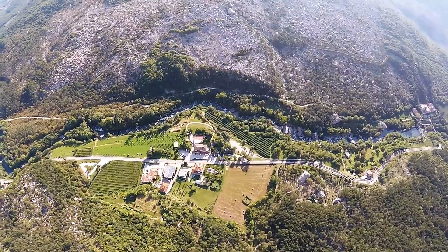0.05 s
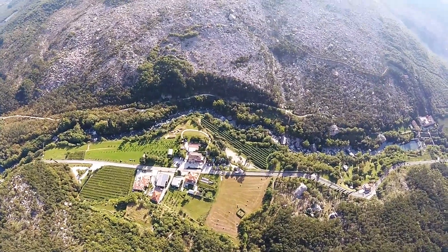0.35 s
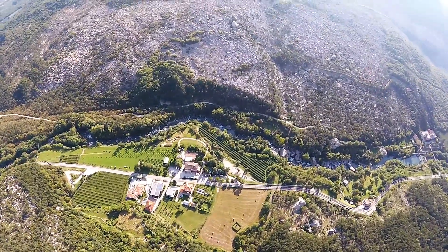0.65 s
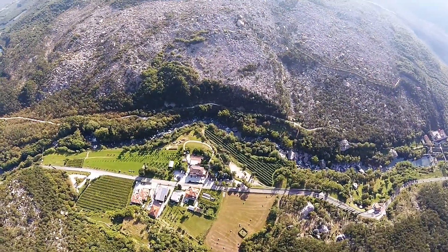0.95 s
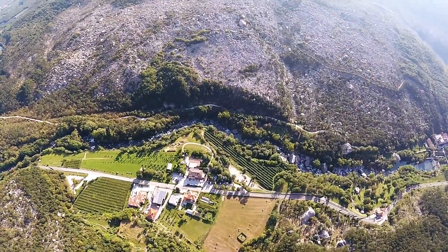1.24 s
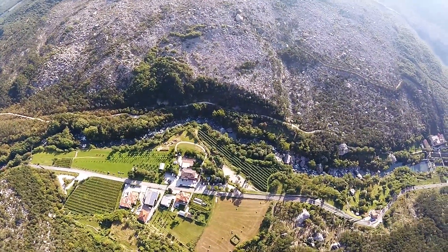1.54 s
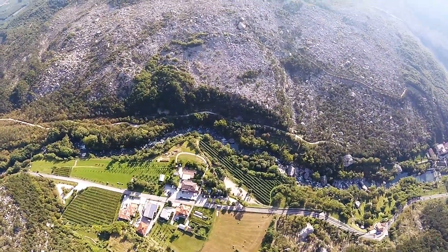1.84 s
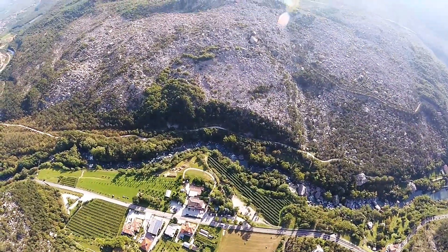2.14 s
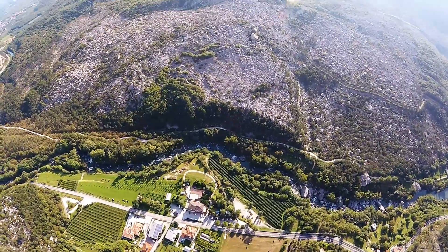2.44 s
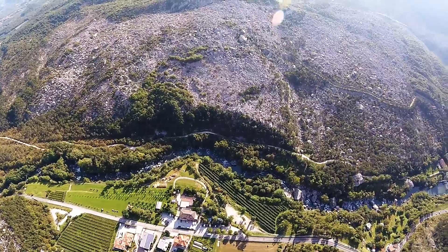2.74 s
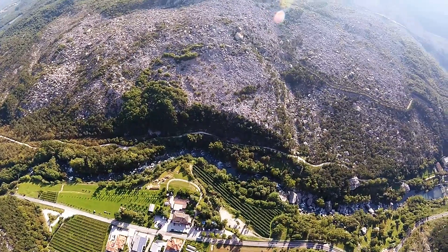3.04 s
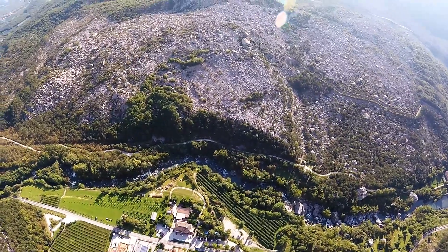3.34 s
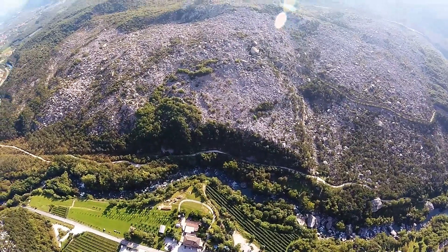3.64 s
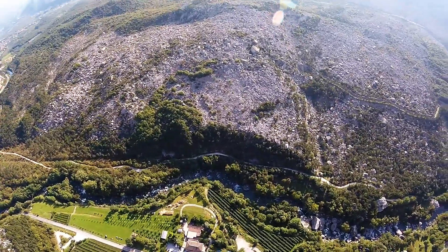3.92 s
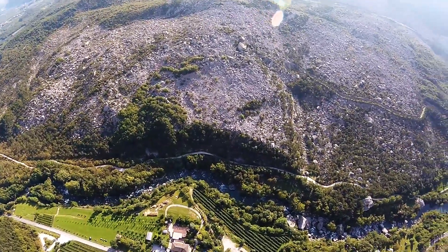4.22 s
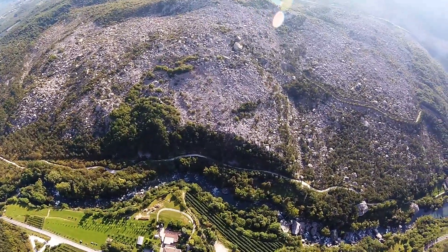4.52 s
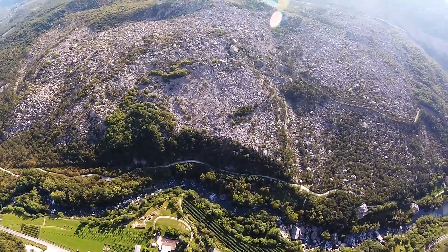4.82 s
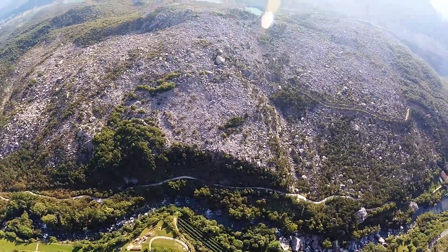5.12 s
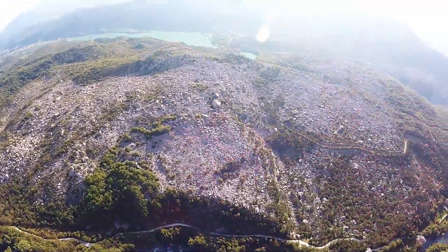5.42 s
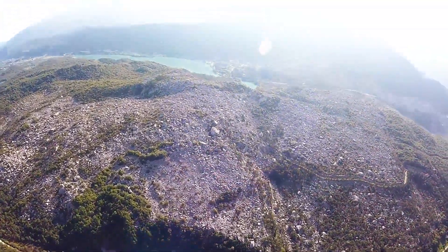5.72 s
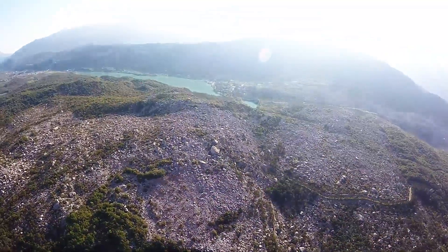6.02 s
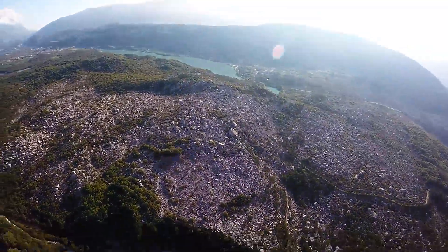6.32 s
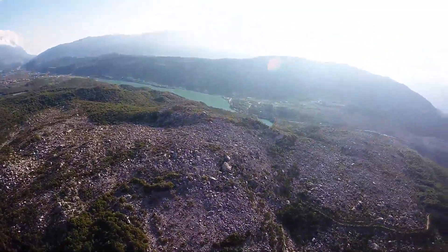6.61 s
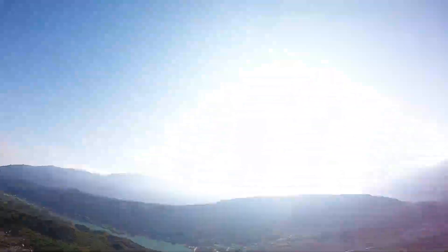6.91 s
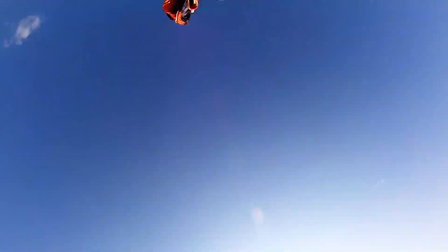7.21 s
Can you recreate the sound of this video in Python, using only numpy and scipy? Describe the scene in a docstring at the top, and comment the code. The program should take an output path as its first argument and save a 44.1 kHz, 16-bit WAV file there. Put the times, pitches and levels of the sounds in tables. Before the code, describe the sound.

Strong wind buffets a microphone in fast flight with a loud, deep rumble, turning rougher and louder near the end.

```python
"""Air above a valley: a camera on a flyer's body races along, then tips up towards the sky.
Eddies pound the microphone port in a deep rumble that a fast bass limiter holds level.
Air roars, rushes and hisses past the housing, spits in short bursts and hums faintly on edges.
As the camera turns, the flow swishes and grows louder, darker and ragged."""
import sys
import numpy as np
from scipy import signal
from scipy.fft import rfft, irfft, next_fast_len
from scipy.io import wavfile
from scipy.ndimage import uniform_filter1d, minimum_filter1d, map_coordinates

SR = 44100
rng = np.random.default_rng(int(sys.argv[2]) if len(sys.argv) > 2 else 0)


def inscribe(sig):
    """Save sig as 16-bit PCM at rate SR to the path in sys.argv[1].

    A 1-D sig is mono; a 2-D sig holds one channel per row.
    Samples are clipped to [-1, 1] before scaling.
    """
    pcm = np.round(np.clip(np.atleast_2d(sig).T, -1, 1) * 32767)
    wavfile.write(sys.argv[1], SR, pcm.astype(np.int16))


N = 328986
TIME_S = np.arange(N) / SR
TOP_HZ = 14500


def amp(db):
    """dB to gain."""
    return 10 ** (np.asarray(db) / 20)


def unit(x):
    """Scale to rms 1."""
    return x / np.sqrt(np.mean(x ** 2) + 1e-20)


def along(points, hz):
    """Interpolate (f/Hz, value) points on log frequency."""
    f, values = np.transpose(points)
    return np.interp(np.log(hz + 1), np.log(f + 1), values)


def bell(hz, centre_hz, octaves):
    """Gaussian on log frequency, peak 1."""
    return np.exp(-.5 * (np.log2(hz / centre_hz) / octaves) ** 2)


def curves(rows):
    """One per-sample curve for each column after t/s."""
    times_s, *columns = np.transpose(rows)
    return [np.interp(TIME_S, times_s, column) for column in columns]


def wobble(knots_per_s):
    """Smooth random curve, rms about 1."""
    knots = rng.standard_normal(int(N * knots_per_s / SR) + 4)
    return map_coordinates(knots, [TIME_S * knots_per_s])


def filtered(x, response):
    """FFT filter with gain response(hz)."""
    size = next_fast_len(N + SR // 2)
    return irfft(rfft(x, size) * response(np.fft.rfftfreq(size, 1 / SR)), size)[:N]


def noise(spectrum):
    """Coloured noise, rms 1, cut off at the spectrum's last point."""
    colour = lambda hz: amp(along(spectrum, hz)) * (hz < spectrum[-1][0])
    return unit(filtered(rng.standard_normal(N), colour))


def moving_noise(spectrum, control, shade_db):
    """Noise of steady rms 1, recoloured over time by shade_db(hz, control)."""
    hz, frames_s, stft = signal.stft(noise(spectrum), SR, nperseg=1024)
    gain = amp(shade_db(np.maximum(hz, hz[1])[:, None], np.interp(frames_s, TIME_S, control)))
    gain /= np.linalg.norm(gain * amp(along(spectrum, hz))[:, None], axis=0)
    return unit(signal.istft(stft * gain, SR, nperseg=1024)[1][:N])


def sliding_band(path, octaves):
    """Noise band along a path of t/s, f/Hz, level/dB."""
    centre_hz, level_db = curves(path)
    band_db = lambda hz, centre: 20 * np.log10(bell(hz, centre, octaves) + 1e-4)
    return amp(level_db) * moving_noise([(0, 0), (TOP_HZ, 0)], centre_hz, band_db)


def limited(x, ceiling, hold_s):
    """Look-ahead limiter: turns each crest down to the ceiling."""
    size = max(int(hold_s * SR), 2)
    gain = ceiling / np.maximum(np.abs(x), ceiling)
    return x * uniform_filter1d(minimum_filter1d(gain, size), size)


def buffet():
    """Large eddies strike the port; the limiter flattens their crests to one height."""
    # eddy strength before overdrive: t/s, rumble level/dB, thud level/dB
    eddy_levels = [(0, -14.5, -18.5), (.8, -12.5, -17), (2.6, -13.5, -21.5), (3.7, -13, -22),
                   (4.7, -12.5, -19), (5.15, -21.5, -20), (5.38, -17.5, -20.5), (5.55, -17.5, -12),
                   (6.3, -16.5, -16), (7.1, -15.5, -10.5), (7.46, -9, -11)]
    # rumble and thud spectra: f/Hz, level/dB
    rumble_spectrum = [(4, -21.5), (12, -8), (22, -1), (34, 0), (55, -4), (72, -6), (95, -31), (200, -73)]
    thud_spectrum = [(42, -29), (66, -4.5), (88, 1), (122, -2), (140, -7), (165, -20.5), (255, -30),
                     (590, -76)]
    rumble_db, thud_db = curves(eddy_levels)
    rumble = noise(rumble_spectrum) * amp(rumble_db + .1)
    thuds = noise(thud_spectrum) * amp(thud_db - 2 + 2 * wobble(32))  # in lumps
    # strong eddies push further into the limiter
    force = np.clip(np.hypot(amp(rumble_db), amp(thud_db)) / .28, 0, 1)
    overdrive_db = 3.8 * force ** 2
    return limited(amp(overdrive_db) * (rumble + thuds + booms()), ceiling=.56, hold_s=.011)


def booms():
    """Eddies of one size briefly prevail and boom in a narrow band."""
    # booms: centre t/s, half-width/s, f/Hz, level/dB
    swells = [(.09, 0.12, 65.6, -11), (0.557, 0.13, 160, -24.5), (3.7, 0.11, 93.6, -17.5),
              (3.95, .4, 187, -37.5), (6.023, 0.15, 88, -16.5), (6.595, 0.078, 174, -20),
              (6.86, .07, 870, -28.5), (7.022, 0.037, 870, -29.5), (7.13, .1, 165, -16.5)]
    sound = np.zeros(N)
    for at_s, width_s, centre_hz, level_db in swells:
        band = filtered(rng.standard_normal(N), lambda hz: bell(hz + 1, centre_hz, octaves=.21))
        sound += amp(level_db) * np.exp(-((TIME_S - at_s) / width_s) ** 2) * unit(band)
    return sound


def airflow():
    """Smaller eddies roar, rush and hiss; tipping up makes the flow heavier, darker and ragged."""
    # air past the housing: t/s, flow base level/dB, hiss base level/dB
    flow_levels = [(0, -33.5, -44.5), (.38, -32.5, -48.5), (.72, -33.5, -48.5), (1.1, -40.5, -55.5),
                   (1.55, -39, -51.5), (1.72, -39, -53.5), (2.15, -42.5, -55.5), (2.45, -44, -51.5),
                   (2.65, -40, -49.5), (3.05, -40, -52), (3.85, -41.5, -49.5), (4.14, -40, -51.5),
                   (4.28, -40.5, -55), (4.47, -40.5, -54), (4.85, -36, -47.5), (5.78, -35.5, -51.5),
                   (5.83, -31, -52.5), (6.5, -31, -48), (6.66, -29, -42.5), (6.73, -29.5, -37),
                   (7.05, -30.5, -40), (7.09, -30, -43.5), (7.19, -30, -45.5), (7.23, -32, -46),
                   (7.36, -37.5, -48), (7.39, -35.5, -53), (7.46, -40, -56)]
    # camera tipping skywards: t/s, tip/0-1
    tipping = [(4.7, 0), (5.45, 0.24), (5.95, 0), (6.55, 0.4), (6.92, 0.36), (7.13, 0.83)]
    # low, mid and treble spectra: f/Hz, level/dB
    roar_spectrum = [(92, -35), (152, -3), (205, -1.5), (305, -3.5), (425, -5.5), (640, -8.5), (940, -14),
                     (1650, -68), (4100, -72)]
    rush_spectrum = [(310, -8.5), (660, -0.5), (960, 1), (1420, -1.5), (2050, -8.5), (2750, -11.5),
                     (3500, -15.5), (4400, -24.5), (5900, -33), (11900, -75)]
    hiss_spectrum = [(2600, -15), (4450, -9), (5500, -1), (6400, -2), (8500, 0), (10000, -0.5),
                     (11200, -6.5), (12500, -9), (14500, -11)]
    flow_db, hiss_db = curves(flow_levels)
    tip, = curves(tipping)
    # the finest eddies come and go fastest
    flutter_db = (.62 + 1.8 * tip ** 2) * unit(np.tanh(wobble(180)) + np.tanh(wobble(90)))
    swell_db = .68 * wobble(22)
    gust_db = gusts()
    tilt_db = lambda hz, db_per_oct: np.log2(hz) * db_per_oct
    roar_db_per_oct = -1 - 5 * tip
    # the rush brightens with the hiss, darkens with the flow
    rush_db_per_oct = 1 - 5 * tip + .4852 * (hiss_db - hiss_db.mean()) - .32 * (flow_db - flow_db.mean())
    roar = moving_noise(roar_spectrum, roar_db_per_oct, tilt_db)
    roar *= amp(flow_db + 6 + 11 * tip + swell_db + gust_db)
    rush = moving_noise(rush_spectrum, rush_db_per_oct, tilt_db)
    rush *= amp(flow_db + 1 + swell_db + flutter_db + .24 * gust_db)
    hiss = hissing(hiss_spectrum, hump_db=1) * amp(hiss_db + .3 + flutter_db)
    return roar + rush + hiss


def hissing(spectrum, hump_db):
    """Treble noise whose peak sinks as the flow swings round the housing."""
    # hiss peak: t/s, f/Hz
    peak_path = [(0, 9000), (1.2, 8460), (2.0, 8140), (2.5, 7400), (3.6, 6760), (4.6, 6870), (5.2, 5700),
                 (5.7, 5240), (6.7, 6360)]

    def shade_db(hz, peak_hz):
        octaves_above = np.maximum(np.log2(hz / peak_hz), 0)
        return hump_db * bell(hz, peak_hz, octaves=.27) - 17 * octaves_above ** 2

    return moving_noise(spectrum, curves(peak_path)[0], shade_db)


def gusts():
    """The roar surges and slackens; returns dB."""
    # gusts and lulls: centre t/s, half-width/s, level change/dB
    surges = [(0.38, 0.16, -6), (1.903, 0.27, 2), (2.446, 0.29, 4), (3.12, 0.11, -5.5), (5.364, 0.036, 4.5),
              (5.562, 0.028, 6), (5.703, 0.075, -2), (5.85, 0.036, 1), (6.597, 0.028, 2.5),
              (6.834, .04, 1.5), (7.03, 0.036, 2.5)]
    return sum(db * np.exp(-((TIME_S - at_s) / width_s) ** 2) for at_s, width_s, db in surges)


def bursts():
    """Flow tears off the port in bright, crackling puffs, each with its own resonance."""
    # puffs: centre t/s, length/s, body level/dB, sizzle level/dB, resonance f/Hz
    puffs = [(0.761, 0.0097, -27, -40, 2000), (0.782, 0.011, -31, -41, 2200),
             (0.839, 0.019, -28.5, -36.5, 2200), (.866, 0.014, -30.5, -38.5, 2100),
             (1.483, 0.017, -29.5, -45, 1200), (1.592, 0.0089, -30, -42.5, 2000),
             (1.694, 0.011, -33, -41, 1500), (1.717, 0.021, -33.5, -41, 1500),
             (2.672, .009, -31.5, -38, 1800), (2.87, 0.007, -36, -38.5, 2300),
             (4.228, .03, -42.5, -57, 2200), (4.331, 0.025, -41, -53, 2200), (4.42, 0.037, -39, -54, 2300),
             (4.518, 0.029, -39.5, -58, 2200), (4.567, 0.029, -40, -58, 2200),
             (4.634, 0.021, -35.5, -56, 2200), (4.681, 0.011, -27.5, -38.5, 2100),
             (4.729, 0.024, -23.5, -34.5, 2300), (4.764, 0.011, -28.5, -40, 2300),
             (4.992, 0.042, -39.5, -45.5, 1900), (5.052, 0.0027, -40, -44, 2300),
             (5.129, 0.158, -36.5, -46, 2400), (5.439, 0.0025, -30, -41, 2000),
             (5.46, 0.11, -33.5, -51, 2000), (7.004, 0.033, -31, -38, 1100), (7.062, 0.027, -31, -38, 1400),
             (7.141, 0.0028, -27.5, -34.5, 1700), (7.184, 0.023, -36, -41, 1400),
             (7.212, 0.011, -31.5, -40, 1400), (7.254, 0.01, -30, -37.5, 1000),
             (7.282, 0.011, -31, -44, 1100), (7.316, .008, -32, -45, 1000), (7.359, .014, -34, -47, 1000),
             (7.38, .004, -32, -47, 1200), (7.402, 0.005, -28.5, -52, 700), (7.429, 0.0048, -35, -46, 1000)]
    # body and sizzle spectra: f/Hz, level/dB
    body_spectrum = [(410, 14.5), (1000, 8), (2000, 2), (3000, -1), (4400, -6.5), (7000, -41), (14000, -80)]
    sizzle_spectrum = [(3000, -24), (5200, 9), (6700, 8), (9000, 7), (10500, 1.5), (12000, -3),
                       (14500, -21)]
    body_gain, sizzle_gain = np.zeros(N), np.zeros(N)
    flap_depth_db, scatter_cycles = 2.8, .25 * wobble(120)
    for at_s, length_s, body_db, sizzle_db, _ in puffs:
        near = np.abs(TIME_S - at_s) < 2 * length_s
        offset_s = TIME_S[near] - at_s
        flap_hz = 340 * (.01 / length_s) ** .4  # longer puffs flap slower
        flap_cycles = offset_s * flap_hz + scatter_cycles[near]
        puff = 1.25 * np.exp(-np.abs(offset_s / (.6 * length_s)) ** 3)
        puff *= unit(amp(flap_depth_db * np.cos(2 * np.pi * flap_cycles)))
        body_gain[near] += amp(body_db) * puff
        sizzle_gain[near] += amp(sizzle_db) * puff
    centres_s, *_, peaks_hz = np.transpose(sorted(puffs))
    resonance_db = lambda hz, peak_hz: 11.5 * bell(hz, peak_hz, octaves=.72)
    body = moving_noise(body_spectrum, np.interp(TIME_S, centres_s, peaks_hz), resonance_db)
    return body_gain * body + sizzle_gain * hissing(sizzle_spectrum, hump_db=4.5)


def thin_hiss():
    """A thin band of hiss slides down in the calm stretch."""
    # hiss band: t/s, f/Hz, level/dB
    path = [(.95, 8800, -72), (1.35, 8250, -55.5), (1.9, 8100, -56.5), (2.35, 7650, -53.5),
            (2.85, 7130, -55), (3.2, 7000, -63)]
    return sliding_band(path, octaves=.16)


def edge_tones():
    """Vortices leave an edge almost regularly: a steady core in a fuzzy band swells, sags and fades."""
    # tones: centre t/s, half-width/s, f/Hz, fall per half-width/octaves, level/dB, core-to-fuzz ratio
    tones = [(1.635, 0.2, 296, 0.043, -32, 2.3), (2.395, 0.65, 291, 0.035, -37, 0.61),
             (3.324, 0.36, 277.3, 0.035, -34.5, 0.7), (4.882, 0.067, 600, 0.096, -33.5, 3.3),
             (4.996, .12, 549, .03, -28.5, 1.6), (4.936, .2, 374, 0, -32.5, 0.13),
             (5.153, 0.204, 268.2, 0.093, -25, 1.3), (5.552, 0.17, 244.2, 0.003, -27, 0.35),
             (6.613, 0.15, 370, 0.098, -24.5, 0.19), (7.116, 0.17, 180, .09, -14, 0.57)]
    sound = np.zeros(N)
    for at_s, width_s, centre_hz, fall_oct, level_db, core in tones:
        progress = (TIME_S - at_s) / width_s
        waver_oct = .0251 * wobble(22)
        pitch_hz = centre_hz * 2 ** (waver_oct - fall_oct * np.clip(progress, -1, 1))
        fuzz = wobble(70) + 1j * wobble(70)
        shedding = (core + fuzz) * np.exp(2j * np.pi * np.cumsum(pitch_hz) / SR)
        sound += amp(level_db) * np.exp(-2 * progress ** 2) * unit(shedding.real)
    return sound


def swish():
    """A noise band dips in pitch, then rises as the housing turns into the flow."""
    # swish band: t/s, f/Hz, level/dB
    path = [(5.4, 2200, -60), (5.7, 2100, -39.5), (6.15, 1960, -48), (6.42, 1500, -47), (6.6, 1550, -34),
            (6.78, 2400, -35.5), (6.9, 2660, -50), (7.1, 2700, -65)]
    return sliding_band(path, octaves=.35)


def scene():
    """Mono: all sources arise at the one microphone port."""
    return (swish() + thin_hiss() + buffet() + airflow() + edge_tones() + bursts())[None]


def record(dry):
    """The camera limits the highest peaks and cuts everything above its band limit."""
    held = limited(dry[0], ceiling=.93, hold_s=.008)
    return filtered(held, lambda hz: hz < TOP_HZ)[None]


dry = scene()
out = record(dry)
inscribe(out)
```